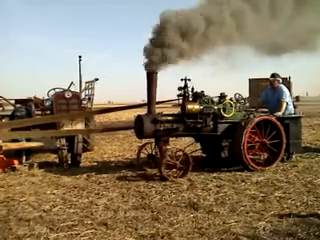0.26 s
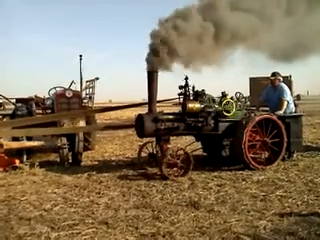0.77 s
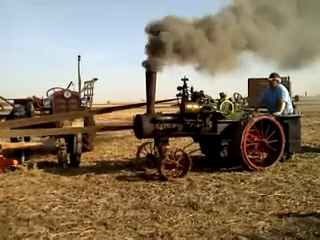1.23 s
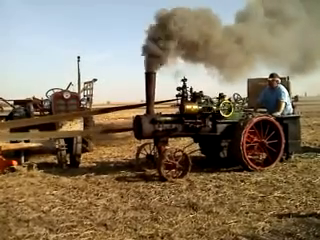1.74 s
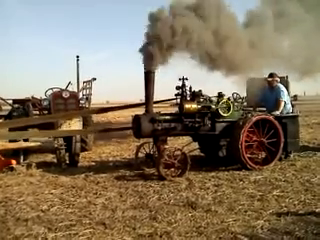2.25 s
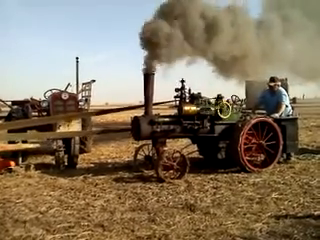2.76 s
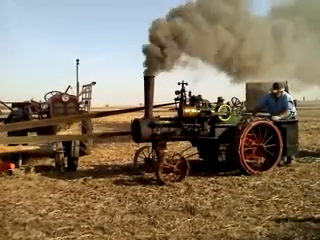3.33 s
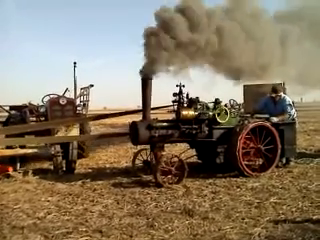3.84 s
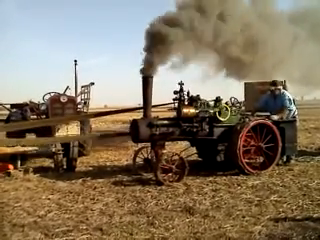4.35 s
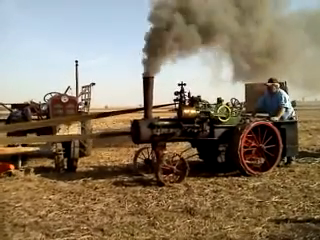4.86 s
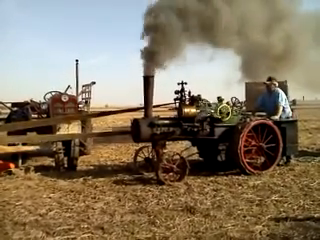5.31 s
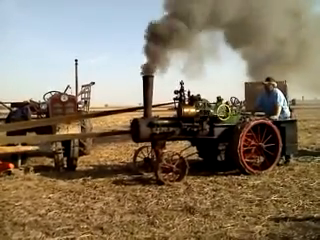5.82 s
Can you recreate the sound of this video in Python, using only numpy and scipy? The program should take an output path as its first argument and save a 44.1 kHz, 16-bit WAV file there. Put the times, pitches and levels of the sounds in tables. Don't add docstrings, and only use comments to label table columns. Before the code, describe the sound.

A steam traction engine under heavy belt load beats very fast, about eleven chuffs a second, over the continuous rough roar of a saw. Dull low knocks come irregularly from the rods, and brief fuzzy hoots escape the chimney in the last seconds. Open field, no echo; a small overloaded microphone makes everything nasal, crackly and clipped.

```python
import sys
import numpy as np
from scipy import signal
from scipy.fft import rfft, irfft, next_fast_len
from scipy.io import wavfile
from scipy.ndimage import uniform_filter1d, map_coordinates

SR = 44100
rng = np.random.default_rng(int(sys.argv[2]) if len(sys.argv) > 2 else 0)


def level_to_linear(level):
    exponent = np.asarray(level, float) / 20
    return 10 ** exponent


def wav_record(signal):
    frames = np.transpose(np.atleast_2d(signal))
    bounded = np.clip(frames, -1, 1)
    quanta = np.round(bounded * 32767).astype(np.int16)
    wavfile.write(sys.argv[1], SR, quanta)


N = 268128


def unit(x):
    return x / np.sqrt(np.mean(x ** 2) + 1e-20)


def filtered(x, response):
    m = next_fast_len(N + 8192)
    spectrum = rfft(x, m) * response(np.fft.rfftfreq(m, 1 / SR))
    return irfft(spectrum, m)[..., :N]


def colour(points):
    hz, db = np.transpose(points)
    return lambda f: level_to_linear(np.interp(np.log(f + 1), np.log(hz), db))


def curve(rows, axis):
    rows = np.array(rows)
    return np.interp(np.arange(N) / SR, rows[:, 0], rows[:, axis])


def bumps(rows, height):
    t = np.arange(0, N, 64) / SR
    s, db, ms = np.transpose(rows)[..., None]
    bells = np.exp(-((t - s) * 1000 / ms) ** 2)
    total = np.sum(height(db) * bells, axis=0)
    return np.interp(np.arange(N) / SR, t, total)


def wobble(rate):
    return map_coordinates(rng.standard_normal(200), [np.arange(N) * rate / SR])


def blown(hz, width_hz):
    return filtered(rng.standard_normal(N), lambda f: f * width_hz / (hz * hz - f * f + 1j * f * width_hz))


def rush(spectrum, patchy_db):
    z = signal.stft(rng.standard_normal(N), nperseg=512)[2]
    across_bins = uniform_filter1d(rng.standard_normal(z.shape), size=4, axis=0)
    eddies = uniform_filter1d(across_bins, size=6, axis=1)
    noise = signal.istft(z * level_to_linear(patchy_db * unit(eddies)), nperseg=512)[1][:N]
    return unit(filtered(noise, colour(spectrum)))


# start in seconds, peak level in dB, ring frequency in Hz.
LINKAGE_KNOCKS = [(0.253, -2, 486), (0.808, -9.5, 590), (1.219, -8, 334), (1.827, -18, 624),
                  (2.166, -6, 410), (2.59, -1.5, 418), (3.639, -11, 640), (3.889, -2.5, 381),
                  (4.077, -5.5, 377), (4.56, -6, 384), (4.649, -4.5, 413), (4.825, -4, 353),
                  (4.996, -20, 305), (5.397, -6, 633), (5.6, -6, 366), (5.722, -7, 453), (5.983, -5.5, 340)]


def linkage(t60=0.048, rise=0.0035):
    out, t = np.zeros(N + SR), np.arange(SR // 5) / SR
    for s, db, hz in LINKAGE_KNOCKS:
        ring = np.sin(2 * np.pi * hz * t) + 0.3 * np.sin(2 * np.pi * 2.1 * hz * t)
        envelope = level_to_linear(db + 14.5 - 60 * t / t60) * (1 - np.exp(-t / rise))
        out[round(s * SR):][:len(t)] += envelope * ring
    return out[:N]


# frequency in Hz, level in dB per Hz.
DRAUGHT_SPECTRUM = [(15, -24), (40, -23), (100, 0.5), (200, -3.5), (350, -24), (600, -26)]
# frequency in Hz, width in Hz.
AIR_COLUMN_MODES = [(340, 36), (520, 350)]
# centre in seconds, low mode level in dB, half length in ms.
CHIMNEY_HOOTS = [
    (4.726, -19, 10),
    (4.855, -16, 11),
    (5.0, -30, 19),
    (5.13, -26, 290),
    (5.18, -43, 28),
    (5.24, -30, 14),
    (5.56, -21.5, 17),
    (5.75, -26, 22),
    (5.83, -23, 19),
    (6.02, -20.5, 33),
]


def chimney(pressure, steady=0.75):
    low, high = (blown(*mode) for mode in AIR_COLUMN_MODES)
    low = low / (np.abs(signal.hilbert(low)) + 1e-9) ** steady
    tone = unit(low) + level_to_linear(-1) * unit(high)
    hoot = level_to_linear(17.0) * bumps(CHIMNEY_HOOTS, level_to_linear) * tone
    draught_db = -15 + 0.37 * curve(ENGINE_EFFORT, axis=1) + 0.61 * wobble(5.8)
    draught = unit(0.18 + pressure) * level_to_linear(draught_db) * rush(DRAUGHT_SPECTRUM, patchy_db=0.0)
    return hoot + draught


# frequency in Hz, level in dB per Hz.
CUTTING_SPECTRUM = [(100, 10), (500, -6.5), (1500, 2.5), (2200, 7.5), (3000, -1.5), (4500, -1)]
CHURN_SPECTRUM = [(150, -23), (400, -3.5), (900, 0.5), (1500, 2), (2000, -21), (3000, -20)]
# time in seconds, level in dB.
BLADE_BITE = [(0, -9), (.5, -7), (1.0, -7.5), (1.4, -10), (2.05, -4.5), (2.6, -8.5), (3.0, -9), (3.6, -10),
              (4.05, -7.5), (4.5, -7), (5.0, -13.5), (5.3, -10), (5.55, -10.5), (6.08, -9.5)]
# frequency in Hz, width in Hz, level in dB.
BLADE_MODES = [(1986, 87, -11), (2374, 85, -12), (2589.6, 48, -15.5), (2746, 70, -15.5)]


def saw():
    bite_db = curve(BLADE_BITE, axis=1)
    ring = sum(level_to_linear(db + 2.6 * wobble(9)) * unit(blown(hz, width_hz)) for hz, width_hz, db in BLADE_MODES)
    cutting = rush(CUTTING_SPECTRUM, patchy_db=2.2)
    blade = level_to_linear(bite_db + 7.5 + 0.41 * wobble(7)) * (cutting + ring)
    churn_db = -5.5 + 0.45 * (bite_db - bite_db.mean()) + 1.55 * wobble(7)
    return blade + level_to_linear(churn_db) * rush(CHURN_SPECTRUM, patchy_db=3.0)


# time in seconds, exhaust beats elapsed.
CRANK_TURN = [(-0.01, 0), (1.288, 14), (3.625, 39), (4.261, 46.5), (4.856, 52), (6.1, 65)]
# time in seconds, steam effort in dB, crispness of the beats from 0 to 1,
# swing of the plume toward the listener in dB.
ENGINE_EFFORT = [(0, -3, 1, 7.5), (.4, 2.5, 0.9, -3), (.65, -2.5, 0, 6.5), (1.0, 1, 0.8, 0),
                 (1.3, -0.5, 0.9, 4.5), (1.65, 1, 0.7, 2.5), (1.9, 1.5, 0.9, 1.5), (2.2, 3, .2, -0.5),
                 (2.55, 1, 0.4, 2), (2.85, -1.5, 0.1, 1), (3.15, 5.5, 0.6, -0.5), (3.45, 2, 0.05, 1.5),
                 (3.75, 4, 0.83, -1), (4.1, 2.5, 0, 2.5), (4.55, 3, .2, -0.5), (4.95, 2, .7, 3),
                 (5.3, 0.5, 0.5, 4), (6.08, 1.5, .9, 3.5)]
# centre in seconds, strength in dB.
EXTRA_PUFFS = [(0.262, 2.5), (0.356, 3.5), (0.45, 4.5), (0.931, 1), (1.095, 5.5), (1.17, 3), (1.285, -4),
               (1.38, 2.5), (1.658, 2.5), (1.986, 2), (2.221, 1), (2.362, 4), (2.537, 7.5), (2.741, 3.5),
               (2.865, 3.5), (2.91, 1.5), (3.076, 7.5), (3.141, 5), (3.247, 5), (3.617, 6.5), (3.897, 5.5),
               (3.982, 2.5), (4.242, 3), (4.475, 3), (4.729, 1), (4.585, 4.5), (5.415, -1), (5.51, 0),
               (5.72, 4), (5.907, 0.5)]


def beats(half_width=0.38, far_end_db=0.04, puff_ms=17):
    turn = curve(CRANK_TURN, axis=1)
    stroke = np.round(turn)
    crisp = np.clip(curve(ENGINE_EFFORT, axis=2), 0, 1)
    far_end = level_to_linear(2 * far_end_db * (stroke % 2))
    beat = far_end * np.exp(-((turn - stroke) / half_width) ** 2)
    effort = level_to_linear(2 * curve(ENGINE_EFFORT, axis=1) + 0.23 * wobble(20.85))
    strokes = effort * (0.5 * (1 - crisp) + crisp * beat)
    puffs = bumps([(s, db, puff_ms) for s, db in EXTRA_PUFFS], lambda db: level_to_linear(2 * db))
    return np.sqrt(strokes + puffs)


# frequency in Hz, level in dB per Hz.
JET_SPECTRUM = [(60, -17), (300, 1.5), (1000, 0), (2000, 1), (3000, 1.5), (4500, 1.5)]


def exhaust(pressure):
    jet = rush(JET_SPECTRUM, patchy_db=2.5)
    upper = filtered(jet, lambda f: 1 / (1 + (2600 / (f + 1)) ** 8))
    swing = level_to_linear(curve(ENGINE_EFFORT, axis=3) + 0.84 * wobble(8))
    return level_to_linear(7.5) * pressure * (jet + (swing - 1) * upper)


# centre in seconds, gain in dB, half length in
# ms.
HISS_DIPS = [(0.048, -9, 4.5), (0.135, 2, 6.3), (0.228, -4.7, 6), (0.322, -6, 7), (0.487, 0, 4),
             (0.56, -8, 4.1), (1.14, 3, 6), (1.525, 0, 12), (1.612, -2, 5.3), (1.704, -1.8, 11),
             (1.808, -3, 10), (1.888, -6, 8), (2.575, -4, 6), (2.721, -4, 5), (2.832, -1.5, 7.8),
             (2.931, -2, 6), (3.469, -2, 8), (3.58, -11, 4.8), (3.76, 0, 8), (4.803, -4, 5.8),
             (4.911, -2.5, 13), (5.004, 2, 5.4), (5.089, -1, 8.3), (5.194, -2, 6), (5.377, -3, 8.1),
             (5.435, -7, 7.4), (5.594, -8.5, 5), (5.675, -8.5, 15), (5.871, -9, 6.5), (6.055, -5, 6)]


def dip_hiss(roar):
    body = filtered(roar, lambda f: 1 / (1 + (f / 1500) ** 4))
    hiss = roar - body
    return body + hiss * level_to_linear(bumps(HISS_DIPS, lambda db: db))


def scene():
    pressure = beats()
    roar = dip_hiss(exhaust(pressure) + saw())
    return (roar + chimney(pressure) + linkage())[None]


# frequency in Hz, gain in dB.
MIC_RESPONSE = [(100, -14.5), (300, -10.5), (1200, -11.5), (1600, -9.5), (1800, -7), (2000, -6.5),
                (2300, -2.5), (2600, 1), (2850, -0.5), (3100, -4), (3350, -9), (3600, -12.5), (3850, -21.5),
                (4400, -31)]


def microphone(dry, early=1.77):
    sensed = filtered(dry, colour(MIC_RESPONSE))
    return early * np.tanh(sensed / early)


# frequency in Hz, level in dB per Hz.
GRIT_SPECTRUM = [(300, 1.5), (3000, -9), (5500, 6.5), (9000, 2.5), (15000, -8)]


def preamplifier(squeezed, edge_hz=4050, boost_db=0.93, top=0.71, hard=60, grit_db=-18):
    band = level_to_linear(boost_db) * filtered(squeezed, lambda f: 1 / np.sqrt(1 + (f / edge_hz) ** 24))
    clipped = band / (1 + np.abs(band / top) ** hard) ** (1 / hard)
    overload = np.sqrt(np.abs(uniform_filter1d((band - clipped) ** 2, size=20)))
    return clipped + level_to_linear(grit_db) * overload * rush(GRIT_SPECTRUM, patchy_db=3.0)


# frequency in Hz, gain in dB.
OUTPUT_RESPONSE = [(25, -5.5), (110, 0), (6000, 0), (7600, -2), (9200, -1.05), (11000, -1.4), (13000, -2.5),
                   (15000, -1.4)]


def output_stage(gritty, rail=0.75):
    return np.clip(filtered(gritty, colour(OUTPUT_RESPONSE)), -rail, rail)


def band_limit(x):
    return signal.sosfilt(signal.butter(12, 15730, fs=SR, output="sos"), x)


def record(dry):
    squeezed = microphone(dry)
    gritty = preamplifier(squeezed)
    staged = output_stage(gritty)
    return band_limit(staged)


dry = scene()
out = record(dry)
wav_record(out)
```